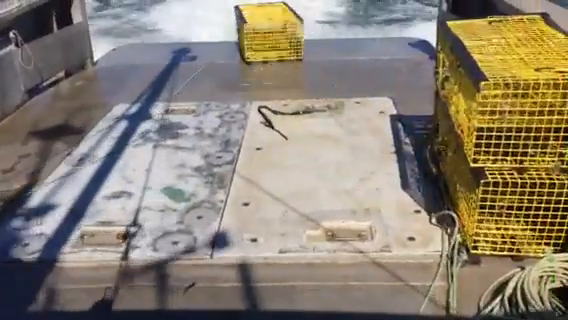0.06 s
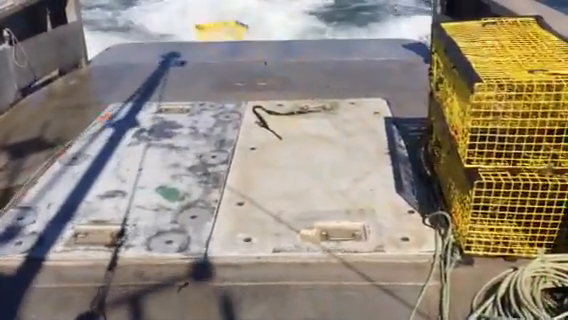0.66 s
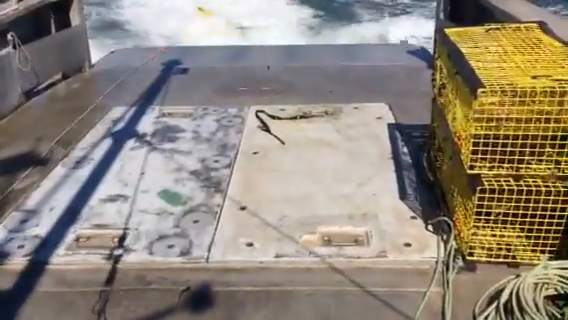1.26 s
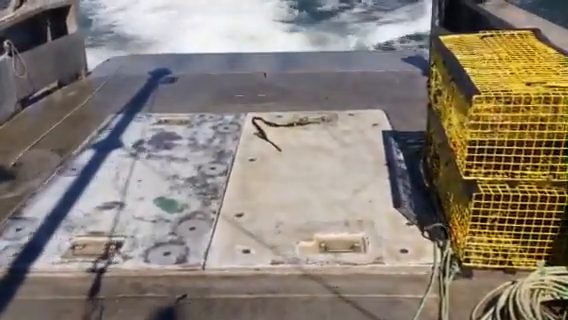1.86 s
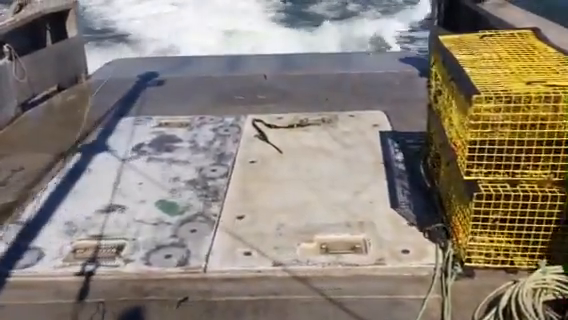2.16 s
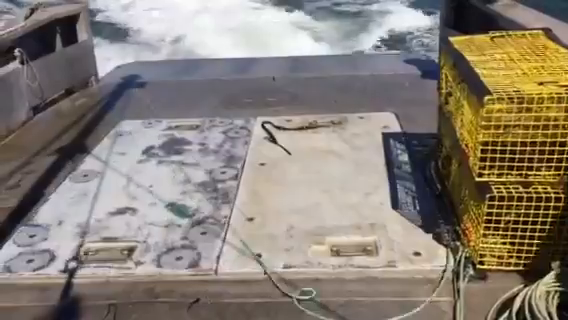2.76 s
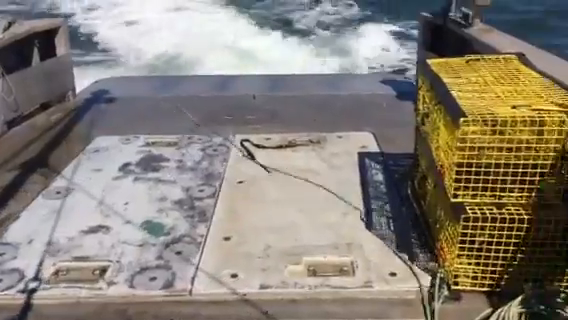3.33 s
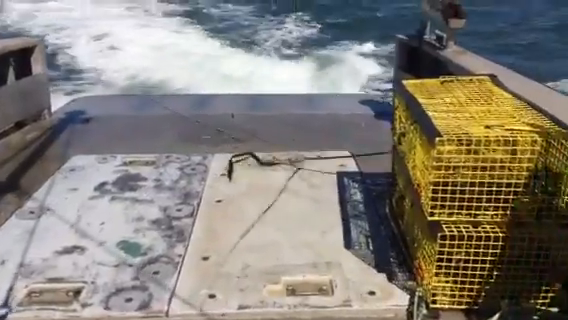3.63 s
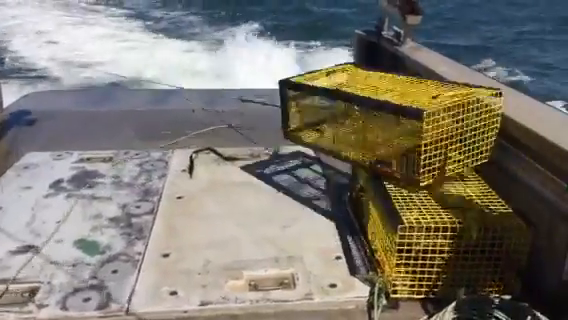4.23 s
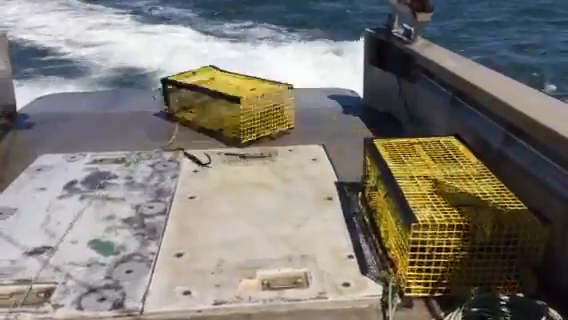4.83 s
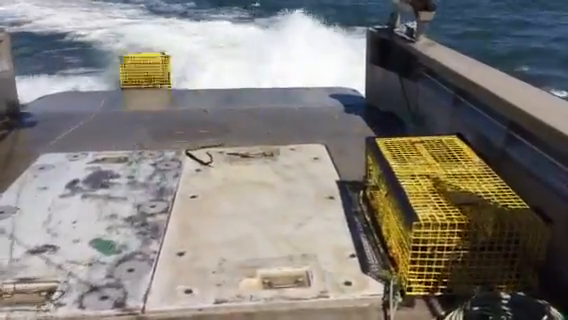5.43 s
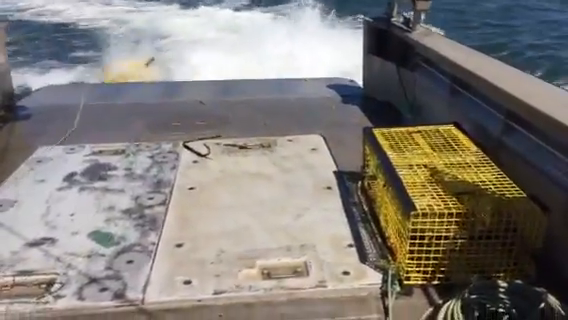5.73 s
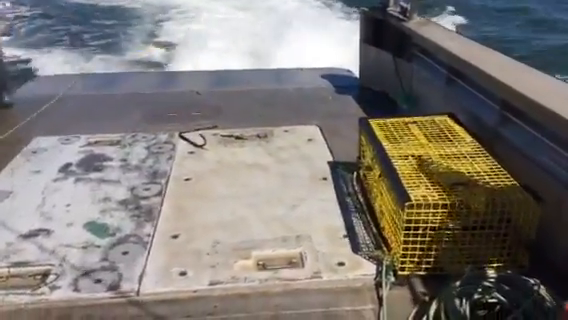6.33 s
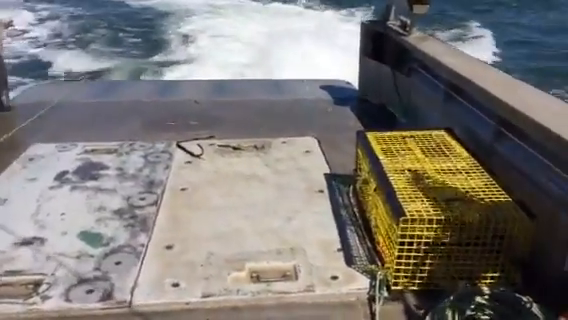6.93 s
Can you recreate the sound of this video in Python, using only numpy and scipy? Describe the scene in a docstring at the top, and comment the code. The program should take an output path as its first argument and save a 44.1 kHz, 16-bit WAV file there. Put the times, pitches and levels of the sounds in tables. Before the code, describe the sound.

Steady diesel throb and churning water, with one wire trap scraping off the deck and another clattering down loudly before sliding overboard.

```python
"""Wire traps leaving a fishing boat

A six-cylinder diesel drones and hisses over the rush of the wake and the thump of the propeller.
One wire trap scrapes off the back of the open deck and splashes. The line drags a second off the
stack: it lands in three rattling blows that boom the deck and ring its mesh, then slides and drops in.
An automatic volume control turns everything down briefly after the blows."""
import sys
import numpy as np
from scipy import signal
from scipy.fft import rfft, irfft
from scipy.io import wavfile
from scipy.ndimage import uniform_filter1d

SR = 44100
rng = np.random.default_rng(int(sys.argv[2]) if len(sys.argv) > 2 else 0)


def bounce(signal):
    """Save signal as a 16-bit WAV file at the path given by the first command-line argument."""
    frames = np.transpose(np.atleast_2d(signal))
    limited = np.clip(frames, -1, 1)
    pcm = np.round(limited * 32767).astype(np.int16)
    wavfile.write(sys.argv[1], SR, pcm)


N = 316638
TIME = np.arange(N) / SR
RING_TIME = np.arange(SR // 2) / SR  # half a second, room for one short sound


# The falling trap's hits, which bunch into blows:
# (time [s], thud [dB], knock [dB], knock pitch [Hz], rattle [dB], rattle rise [s])
TRAP_HITS = [(4.7003, -4, -18, 1340, -22.5, .003), (4.712, -19, -29, 1000, -16.5, 0.0055),
             (4.728, -26, -17, 950, -26, .004), (4.738, -11.5, -19, 340, -25, .004),
             (4.778, -12.5, -32, 520, -26, 0.011), (4.8311, -5.5, -6, 706, -19, .003),
             (4.85, -5, -9, 566, -18.5, .008), (4.8625, -18, -6.5, 695, -32, .006),
             (4.884, -19, -22, 430, -30, .003), (4.916, -15, -8, 413, -19.5, 0.0046),
             (4.929, -14, -8.5, 910, -16.5, 0.0043), (4.946, -17, -18, 784, -28, .004),
             (4.962, -40, -30, 600, -28, 0.0073), (5.022, -19, -23, 900, -30, .005),
             (5.118, -20, -23.5, 403, -28.5, .0062), (5.157, -11.5, -29, 442, -36, .01)]
# The notes of the deck plates: (pitch [Hz], level [dB], time to fade 60 dB [s])
DECK_NOTES = [(73.6, -13, 0.8), (105.5, 2, 0.12), (119.5, -6, 0.15), (188.7, -14.5, 0.45),
              (235.4, -8, 0.18), (323.6, -11.5, 0.17)]
# Wires striking each other and the deck: (frequency [Hz], level [dB])
CLASH_SPECTRUM = [(120, -14), (300, 10.5), (1000, 5), (1500, 3), (2200, 1.5), (3500, -0.9), (5200, -7),
                  (7500, -10), (10500, -16), (15500, -22)]

def trap_landing(rattle_fall_s=.023, loose_fall_s=.13, loose_db=-21, mesh_share=.34):
    """Each hit booms the deck, knocks the trap's frame and sets its loose wire panels chattering."""
    out = np.zeros(N)
    thud = ring(DECK_NOTES) * np.minimum(RING_TIME / .005, 1)  # the deck takes a moment to give
    thud /= abs(thud).max()
    for start, thud_db, knock_db, hz, rattle_db, rise in TRAP_HITS:
        contacts = clicks(per_s=1800, spread_db=1.5, size=len(RING_TIME))
        shake = burst(rise, rattle_fall_s) + gain_of(loose_db) * burst(rise, loose_fall_s)
        rattle = coloured(contacts, CLASH_SPECTRUM) * shake + mesh_share * mesh_ring(contacts * shake)
        impact = gain_of(thud_db) * thud + gain_of(knock_db) * frame_knock(hz)
        add(out, start, impact + gain_of(rattle_db) * rattle)
    return out


# The notes of the trap's frame and runners: (pitch [Hz], level [dB], time to fade 60 dB [s])
FRAME_NOTES = [(318, -7, .11), (402, 0, .1), (446, -1, .1), (595, -3, .09), (680, 0, .08), (755, -2, .09),
               (806, -5, .09), (960, -5, .07), (1073, 0, .08), (1140, -2, .1), (1351, -5, .07),
               (1640, -4, .05), (1845, -4, .06)]

def frame_knock(hz):
    """Rings the frame's notes near hz; neighbours start in opposite directions, so the ring builds up."""
    knock = sum((-1) ** k * ring([(pitch, db + hump_db(pitch, hz, octaves=.55), fade_s)])
                for k, (pitch, db, fade_s) in enumerate(FRAME_NOTES))
    return knock / abs(knock).max()


# The notes of the wire mesh: (pitch [Hz], level [dB], time to fade 60 dB [s])
MESH_NOTES = [(1060, -4, .1), (1141, -4, .1), (1319, -6, .2), (1852, -4, .18), (2110, -1.5, .14),
              (2261, -4, .11), (2449, -5, .13), (2832, -7, .08), (3068, -5, .11), (3219, -5, .09),
              (3424, -4, .15), (3604, -3, .11), (3950, -5, .08), (4395, -4, .08), (4689, -4, .08),
              (5070, -5, .08), (5510, -8, .06), (6230, -6, .07), (6449, -9, .08), (7101, -9, .06)]

def mesh_ring(strikes):
    """Strikes ring the mesh; each corner of the cage favours other wires, of slightly different pitch."""
    mesh = ring([(hz * rng.uniform(.975, 1.025), db + 2.5 * rng.standard_normal(), fade_s)
                 for hz, db, fade_s in MESH_NOTES])
    return signal.fftconvolve(strikes, mesh / np.linalg.norm(mesh))[:len(strikes)]


# Single wires snapping: (time [s], level [dB], pitch [Hz])
WIRE_SNAPS = [(4.699, -33, 6500), (4.7008, -18.5, 1600), (4.7085, -22, 4800), (4.717, -18, 3600),
              (4.7195, -18, 5400), (4.7835, -25, 7300), (4.7935, -30, 4000), (4.813, -27, 4500),
              (4.8322, -17.5, 6300), (4.8345, -23, 2600), (4.8535, -31, 9000), (4.8695, -26, 5500),
              (4.8865, -28, 10500), (4.917, -27, 5000), (4.9275, -18, 3800), (4.9345, -21, 5000),
              (4.9355, -28, 12000), (4.949, -27, 7000), (4.975, -27, 3600), (5.009, -32, 5000),
              (5.0245, -26, 4000), (5.035, -32, 2500), (5.057, -30, 2530), (5.079, -41, 9000),
              (5.1145, -35, 8000), (5.122, -31, 2300), (5.409, -36, 7000)]

def wire_snaps(fall_s=.0025, mesh_share=.3):
    """A wire hits another wire or the deck with a bright tick that rings on in the mesh."""
    out = np.zeros(N)
    for start, db, hz in WIRE_SNAPS:
        noise = focused(rng.standard_normal(len(RING_TIME)), hz, octaves=.6)
        tick = noise * np.exp(-RING_TIME / fall_s)
        add(out, start, gain_of(db) * (tick + mesh_share * mesh_ring(tick)))
    return out


# Each slide: (start [s], length [s], level [dB], change on the way [dB], brightness [dB per octave])
TRAP_SLIDES = [(0, 0.43, -40.5, 8, 1), (4.223, 0.33, -46.5, 15, 2), (5.122, 0.34, -23.5, -4.5, 0.5)]
# Runners rubbing on the deck: (frequency [Hz], level [dB])
SCRAPE_SPECTRUM = [(60, 10), (140, -5), (350, 4.5), (600, -6.5), (1000, -3.5), (1400, -11.5), (2300, -11),
                   (3000, -15), (4000, -33), (12000, -35)]

def trap_slides(rise_s=.019, fall_s=.06, dulling_db_per_octave_s=6, judder_db=1.7):
    """A trap's runners catch and slip on the deck; it sounds duller as it moves away."""
    scrape = coloured(clicks(per_s=1800, spread_db=2.5, size=N), SCRAPE_SPECTRUM)
    hz, t, bands = signal.stft(scrape, SR, nperseg=512)
    octaves_up = np.log2(np.maximum(hz, 600) / 600)[:, None]
    rubbing = np.zeros(bands.shape)
    for start, length, db, change_db, brightness in TRAP_SLIDES:
        age = np.clip(t - start, 0, length)
        contact = np.minimum(age / rise_s, 1) * np.exp(-np.maximum(t - start - length, 0) / fall_s)
        treble_db = octaves_up * (brightness - dulling_db_per_octave_s * age)
        rubbing += contact * gain_of(db + change_db * age / length + treble_db)
    judder = gain_of(judder_db * wander(t, 35))
    return signal.istft(bands * rubbing * judder, nperseg=512)[1][:N]


# Bumps against the boat: (time [s], knock [dB], pitch [Hz], scuff [dB], scuff rise [s])
BOAT_BUMPS = [(.108, -27, 850, -30, .014), (.162, -32, 1300, -35, .012), (.233, -25, 760, -29.5, .014),
              (.258, -23, 480, -34, .006), (.298, -29, 600, -35, .01), (.332, -28, 340, -33, .01),
              (.367, -25, 730, -32, .008), (.397, -36, 2000, -36, .006), (.44, -29, 640, -34, .01),
              (.472, -30, 900, -34, .008), (4.224, -29, 1730, -36, .037), (4.514, -28, 1650, -34, .0096),
              (5.119, -29, 1600, -26.5, .009), (5.182, -26, 900, -32, .012), (5.308, -25, 420, -32, .008),
              (5.384, -38, 2700, -31.5, .008), (5.405, -30, 1100, -32, .008),
              (6.602, -33, 1700, -30.5, .012), (6.616, -32, 900, -29, .01), (6.624, -34, 400, -30.5, .006)]
# A corner scuffing the boat: (frequency [Hz], level [dB])
SCUFF_SPECTRUM = [(150, -6), (450, 3), (800, 0), (1100, -3), (1400, -1.5), (1800, -4), (2900, -4),
                  (3600, -19), (12000, -31)]

def bumps():
    """The sliding traps, and at last the line, bump the boat: a dull knock with a short scuff."""
    out = np.zeros(N)
    for start, knock_db, hz, scuff_db, rise in BOAT_BUMPS:
        grit = coloured(clicks(per_s=3000, spread_db=2.5, size=len(RING_TIME)), SCUFF_SPECTRUM)
        scuff = focused(grit, hz, octaves=.96) * burst(rise, fall_s=.015)
        add(out, start, gain_of(knock_db) * frame_knock(hz) + gain_of(scuff_db) * scuff)
    return out


# The engine's strong tones: (multiple of the cycle rate, level [dB])
STRONG_TONES = [(6, -23.7), (9, -33.5), (12, -37.5), (14, -45), (18, -42), (25, -47), (27, -48.5),
                (28, -47.5), (30, -49.5), (39, -51), (40, -50.5), (42, -50.5), (44, -53), (48, -51),
                (54, -53), (66, -53.5), (80, -54), (81, -49.5), (84, -51.5), (86, -51.5), (87, -48.5),
                (101, -55), (108, -55), (112, -52.5), (115, -56), (138, -57), (150, -58), (192, -58)]
# The outline of all its weaker tones: (frequency [Hz], level [dB])
WEAK_TONES = [(10, -80), (50, -62), (100, -53), (160, -58), (200, -54), (400, -57), (520, -61), (620, -58),
              (780, -57), (900, -60), (1100, -60), (1250, -66), (1450, -66), (2000, -69), (2600, -80)]
# The drone changes as the listener moves on deck: (time [s], change [dB], extra for the lope [dB])
DRONE_CHANGES = [(0, -2, 5.5), (.7, -.2, -1), (1.3, -1, 5), (1.7, -0.5, -5), (1.95, 1.3, 2), (2.15, 0, -15),
                 (2.45, 1.5, 4), (2.75, -1.5, 3), (3.05, 1.5, -8), (3.3, -.6, -7), (3.7, 1.5, -10),
                 (4.2, -.8, 1.5), (4.6, 0, 2.5), (5.5, -1.5, 3), (5.9, -3.3, 6.5), (6.7, -2.1, 6.5),
                 (7.18, -1, -3)]
# The listener turns toward the side rail: (time [s], share of the turn [0-1])
LISTENER_TURN = [(4.6, 0.083), (6.2, 1)]

def diesel(cycles, turn, uneven_db=.5, clatter_lift_db=1.2):
    """Six unequal cylinders repeat one pattern every cycle: many tones above a strong firing tone."""
    multiple = np.arange(2 ** 13 + 1)
    # The lope is a tone at 1.5 times the firing rate; valves and fuel injectors make the clatter.
    firing, lope, octave, clatter = multiple == 6, multiple == 9, multiple == 12, multiple >= 20
    level_db = spectrum_at(WEAK_TONES, multiple * CYCLES_PER_S)
    level_db += uneven_db * rng.standard_normal(len(multiple))
    for k, db in STRONG_TONES:
        level_db[k] = db + clatter_lift_db * clatter[k]
    # The exhaust tones keep in step and add up to a chug; the others start at random.
    phase = np.where(firing | lope, .5, rng.random(len(multiple))) * ~octave
    tones = gain_of(level_db) * np.exp(2j * np.pi * phase) * (multiple > 0) * (multiple < 300)
    drone_db = curve(DRONE_CHANGES)
    groups = ((~lope & ~octave & ~clatter, drone_db + .2 * wander(TIME, 11)),
              (lope, drone_db + curve(DRONE_CHANGES, column=2)),
              (octave, drone_db - 25 * turn),
              (clatter, 1.4 * wander(TIME, 9)))
    out = np.zeros(N)
    for group, change_db in groups:
        pattern = irfft(tones * group) * len(multiple) * np.sqrt(2)
        place_in_cycle = np.linspace(0, 1, len(pattern), endpoint=False)
        out += np.interp(cycles % 1, place_in_cycle, pattern) * gain_of(change_db)
    return out


# Exhaust and churning water: (frequency [Hz], level [dB])
ROAR_SPECTRUM = [(5, -26), (25, -14), (50, -2.5), (80, -6), (115, -11.5), (170, -4), (330, -5), (420, -7),
                 (520, -9.5), (780, -12), (1080, -12), (1220, -14), (2050, -18), (2550, -24), (3700, -25.5),
                 (5600, -25.5), (15500, -50.5)]
# The propeller's wash drumming on the hull: (frequency [Hz], level [dB])
RUMBLE_SPECTRUM = [(20, -28), (40, -6), (72, -6.5), (100, -5), (116, -1.5), (135, -5.5), (160, -14),
                   (400, -53), (2000, -100)]

def wake(cycles, turn, roar_db=-32, rumble_db=-31):
    """Churning water roars, and its rumble in the hull pulses with every second firing."""
    surge_db = -.3 * wander(TIME, 1.47)
    roar = churn(ROAR_SPECTRUM, patchy_db=1.1, flicker_db=-.07) * gain_of(roar_db + surge_db)
    chug = unit_level(1 + (.2 + .45 * turn) * np.cos(2 * np.pi * 3 * cycles))
    rumble = coloured(rng.standard_normal(N), RUMBLE_SPECTRUM) * chug
    return roar + rumble * gain_of(rumble_db + .5 * turn + surge_db)


# Foam and spray: (frequency [Hz], level [dB])
SPRAY_SPECTRUM = [(500, -28), (1500, -14), (3000, 8), (6500, 3), (10000, 0), (15500, -4.5)]
# Splashes of the traps and the wake: (peak time [s], level [dB], rise [s], fall [s])
WATER_SPLASHES = [(.70, -38.5, 0.069, 0.039), (2.99, -45, .02, .035), (3.88, -42, .13, .08),
                  (5.53, -43, .025, 0.051), (5.71, -41, 0.1, 0.24)]

def spray(turn, steady_db=-47.5, drop_share=.76):
    """Fine fizz and separate drops make a wash of sound that leaps up at each splash."""
    fizz = churn(SPRAY_SPECTRUM, patchy_db=3, flicker_db=.56)
    drops = coloured(clicks(per_s=2100, spread_db=1.5, size=N), SPRAY_SPECTRUM)
    power = gain_of(steady_db + 4 * turn) ** 2
    for peak, db, rise, fall in WATER_SPLASHES:
        splash = np.exp(np.minimum((TIME - peak) / rise, (peak - TIME) / fall))
        power += (gain_of(db) * splash) ** 2
    return unit_level(fizz + drop_share * drops) * np.sqrt(power)


def propeller(cycles, turn, blades_per_cycle=8.33):
    """The blades thump a little lower than the engine's lope, so the two tones throb together."""
    level_db = -45 + 4.5 * turn + 1.5 * wander(TIME, 5)
    return gain_of(level_db) * np.sqrt(2) * np.sin(2 * np.pi * blades_per_cycle * cycles)


# The bands of the air's hiss: (centre [Hz], width [Hz], level [dB])
HISS_BANDS = [(4320, 390, -0.5), (4364, 130, -6), (4710, 87, -8)]
# Moments when the hiss swells: (time [s], boost [dB])
HISS_SWELLS = [(1.22, 2.8), (1.77, 3), (2.85, 3.4), (3.44, 3), (6.17, 2.4)]

def air_hiss(cycles, level_db=-48.5, swell_s=.074):
    """The engine's air makes a narrow hiss that throbs with each firing, wavers and sometimes swells."""
    hz = np.fft.rfftfreq(N, 1 / SR)
    hiss = np.zeros(N)
    for centre, width, db in HISS_BANDS:
        band = rfft(rng.standard_normal(N)) / (1 + 2 * ((hz - centre) / width) ** 2)
        hiss += gain_of(db) * unit_level(irfft(band, N))
    throb = 1 + .33 * np.cos(2 * np.pi * 6 * cycles)
    swells_db = sum(db * np.exp(-((TIME - peak) / swell_s) ** 2) for peak, db in HISS_SWELLS)
    return hiss * throb * gain_of(level_db + swells_db + .5 * wander(TIME, 14))


# Whistles within the hiss: (peak time [s], level [dB], pitch [Hz])
AIR_WHISTLES = [(1.72, -42, 4320), (1.802, -46, 4400), (1.933, -48, 4280)]

def air_whistles(half_length_s=.014, sag_hz_per_s=4000):
    """The engine's air gives brief whistles that fall slightly in pitch."""
    out, t = np.zeros(N), RING_TIME - RING_TIME.mean()
    for peak, db, hz in AIR_WHISTLES:
        tone = np.sqrt(2) * np.sin(2 * np.pi * np.cumsum(hz - sag_hz_per_s * t) / SR)
        add(out, peak + t[0], gain_of(db) * tone * np.exp(-(t / half_length_s) ** 2))
    return out


def churn(spectrum, patchy_db, flicker_db):
    """Water noise whose level drifts in patches of time and pitch and flickers as a whole."""
    _, t, bands = signal.stft(rng.standard_normal(N), SR, nperseg=1024, noverlap=768)
    patches = uniform_filter1d(rng.standard_normal(bands.shape), size=14, axis=0)
    patches = unit_level(uniform_filter1d(patches, size=10, axis=1))
    bands *= gain_of(patchy_db * patches + flicker_db * wander(t, 30))
    return coloured(signal.istft(bands, nperseg=1024, noverlap=768)[1][:N], spectrum)


def ring(notes):
    """The fading notes of something struck once."""
    return sum(gain_of(db - 60 * RING_TIME / fade_s) * np.sin(2 * np.pi * hz * RING_TIME)
               for hz, db, fade_s in notes)


def clicks(per_s, spread_db, size):
    """Random tiny hits, a few harder than the rest."""
    force = gain_of(spread_db * np.minimum(rng.exponential(1, size), np.pi)) * rng.choice([-1, 1], size)
    return unit_level(force * (rng.random(size) < per_s / SR))


def burst(rise_s, fall_s):
    """A loudness shape that builds up, then dies away."""
    attack = np.sqrt(np.minimum(RING_TIME / rise_s, 1))
    return attack * np.exp(-np.maximum(RING_TIME - rise_s, 0) / fall_s)


def wander(t, top_hz):
    """A random wobble, no faster than top_hz."""
    rates = np.geomspace(top_hz / 10, top_hz, 20)
    return unit_level(sum(np.sin(2 * np.pi * (hz * t + rng.random())) / np.sqrt(hz) for hz in rates))


def coloured(x, spectrum):
    """Gives x the lows and highs of a spectrum table, at level 1."""
    hz = np.fft.rfftfreq(len(x), 1 / SR)
    return unit_level(irfft(rfft(x) * gain_of(spectrum_at(spectrum, hz)), len(x)))


def focused(x, centre_hz, octaves):
    """Keeps the part of x near one pitch, at level 1."""
    hz = np.fft.rfftfreq(len(x), 1 / SR)
    return unit_level(irfft(rfft(x) * gain_of(hump_db(hz, centre_hz, octaves)), len(x)))


def hump_db(hz, centre_hz, octaves):
    """A hump that is 10 dB down this many octaves from its centre."""
    return -np.minimum(10 * (np.log2((hz + 1) / centre_hz) / octaves) ** 2, 60)


def spectrum_at(spectrum, hz):
    """A spectrum table's level at any frequency."""
    table_hz, db = np.transpose(spectrum)
    return np.interp(np.log(hz + 1), np.log(table_hz + 1), db)


def curve(rows, column=1):
    """Joins the points of a time table with straight lines."""
    columns = np.transpose(rows)
    return np.interp(TIME, columns[0], columns[column])


def gain_of(db):
    """Turns decibels into a multiplier."""
    return 10 ** (np.asarray(db) / 20)


def unit_level(x):
    """Scales x to an average (rms) level of 1."""
    return x / np.sqrt(np.mean(x ** 2) + 1e-20)


def add(mix, start_s, sound):
    """Adds a sound to the mix at a given time."""
    part = mix[round(start_s * SR):][:len(sound)]
    part += sound[:len(part)]


CYCLES_PER_S, SPEED_DRIFT = 9.376, .0004  # engine speed (six firings a cycle), share it drifts by

def scene():
    """The running boat, the water and the traps, mixed to one channel."""
    cycles = np.cumsum(CYCLES_PER_S * (1 + SPEED_DRIFT * wander(TIME, 2.01))) / SR
    turn = curve(LISTENER_TURN)
    engine = diesel(cycles, turn) + air_hiss(cycles) + air_whistles()
    water = wake(cycles, turn) + spray(turn) + propeller(cycles, turn)
    traps = trap_landing() + wire_snaps() + bumps() + trap_slides()
    return (traps + engine + water)[None]


def record(dry, threshold_db=-16, squeeze=.45, recovery_db_per_s=13, ceiling=.75, top_hz=15450):
    """The volume dips after loud blows and recovers slowly; peaks round off and the top treble is cut."""
    power_db = 10 * np.log10(abs(uniform_filter1d(dry[0] ** 2, size=700, origin=349)) + 1e-12)
    recovery_db = TIME * recovery_db_per_s
    held_db = np.maximum.accumulate(power_db + recovery_db) - recovery_db
    excess_db = np.maximum(held_db - threshold_db, 0)
    dipped = dry / gain_of(squeeze * uniform_filter1d(excess_db, size=300, origin=149))
    rounded = dipped / (1 + (dipped / ceiling) ** 6) ** (1 / 6)
    treble_cut = signal.firwin(801, top_hz, window=("kaiser", 9), fs=SR)
    return signal.oaconvolve(rounded, treble_cut[None], "same")


dry = scene()
out = record(dry)
bounce(out)
```